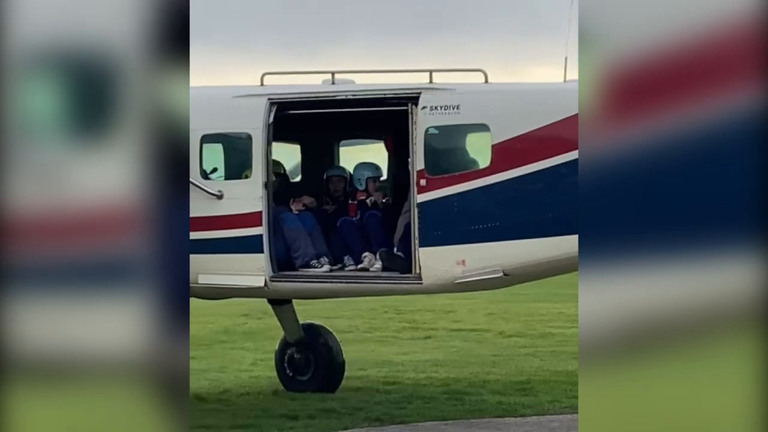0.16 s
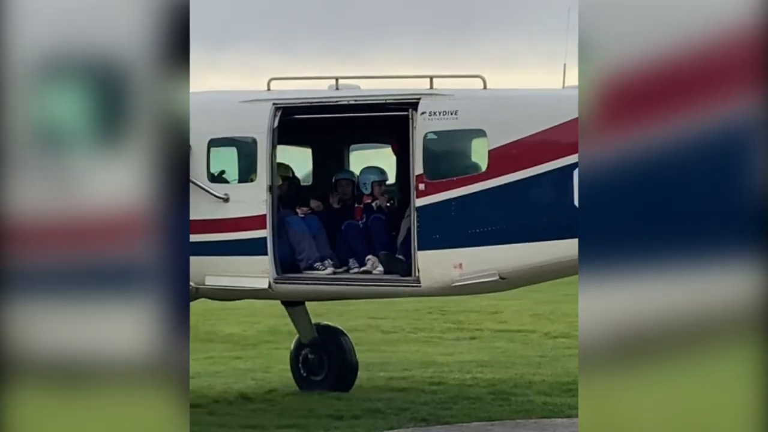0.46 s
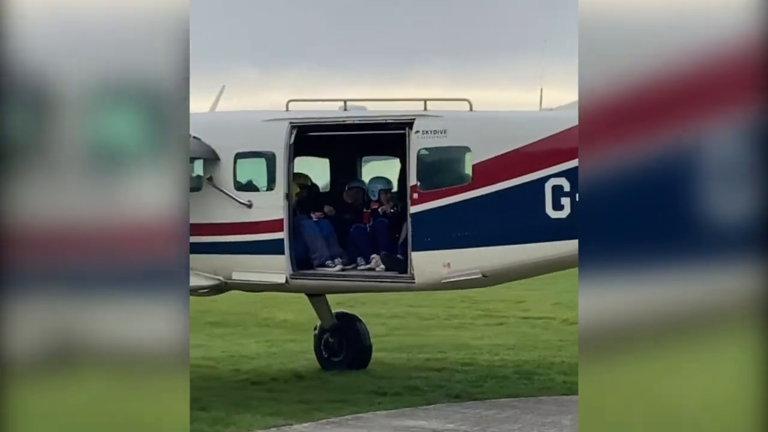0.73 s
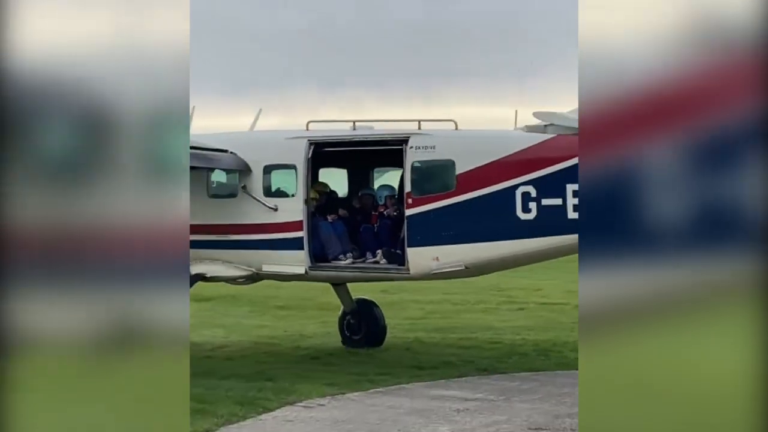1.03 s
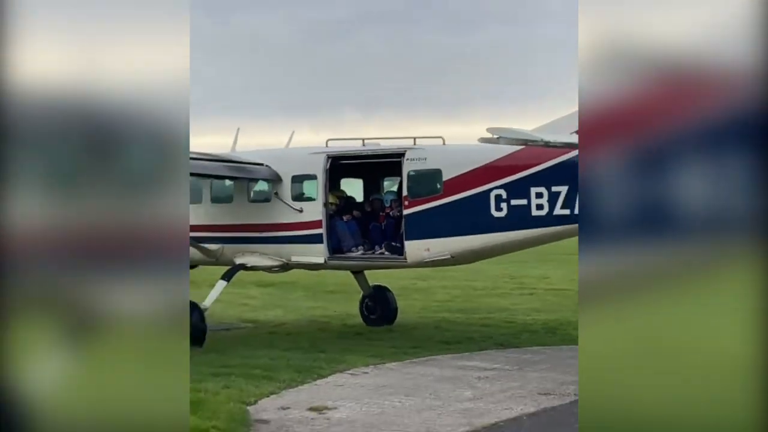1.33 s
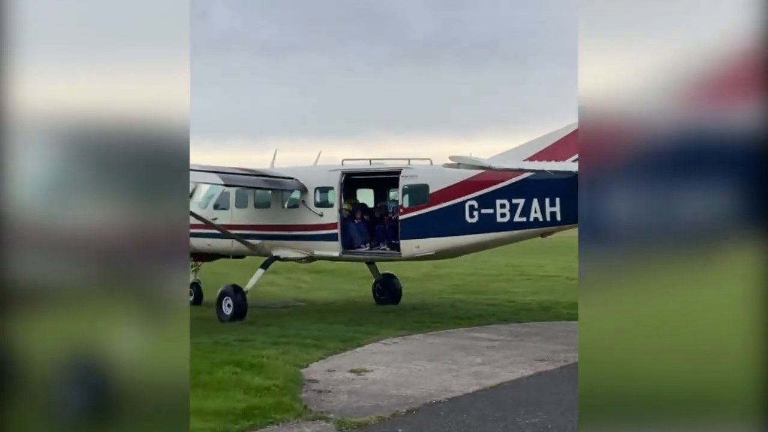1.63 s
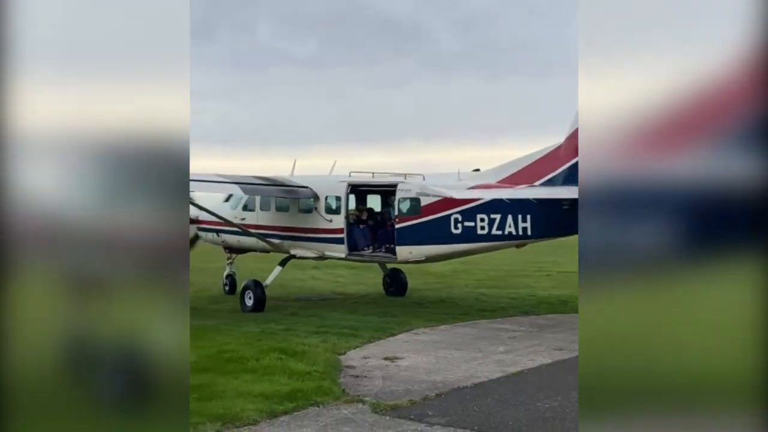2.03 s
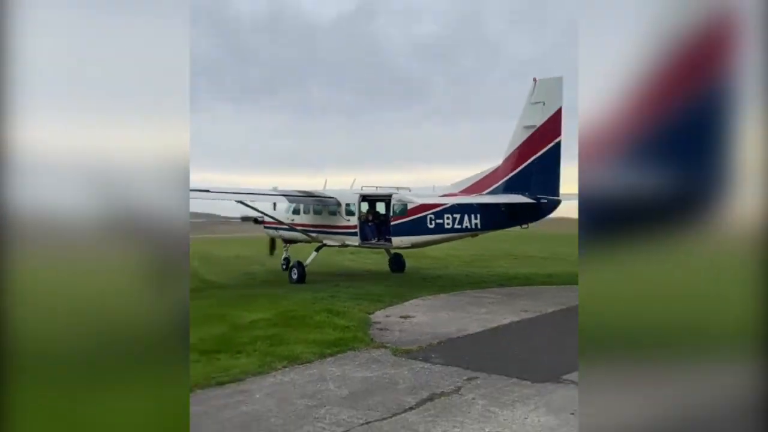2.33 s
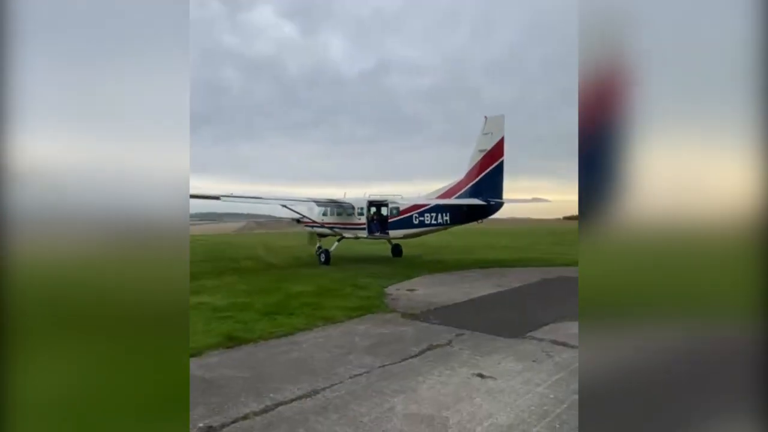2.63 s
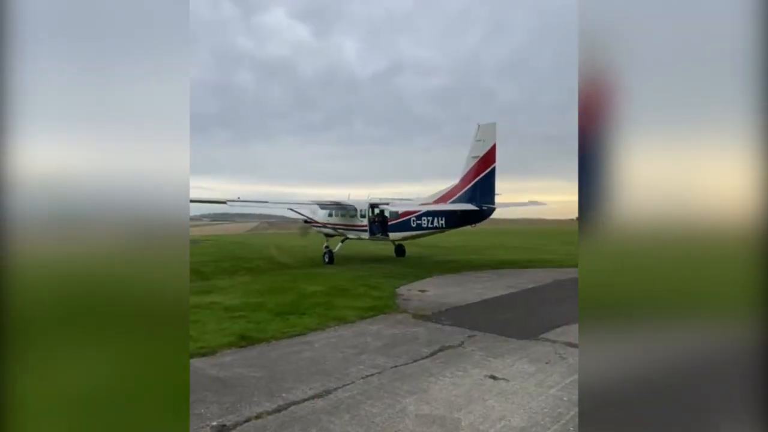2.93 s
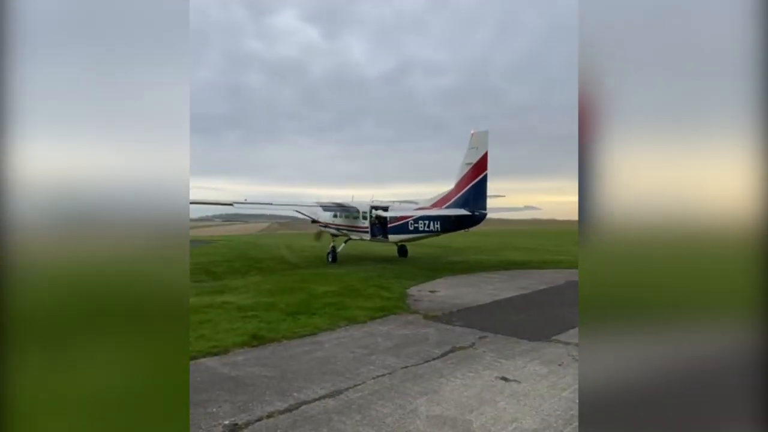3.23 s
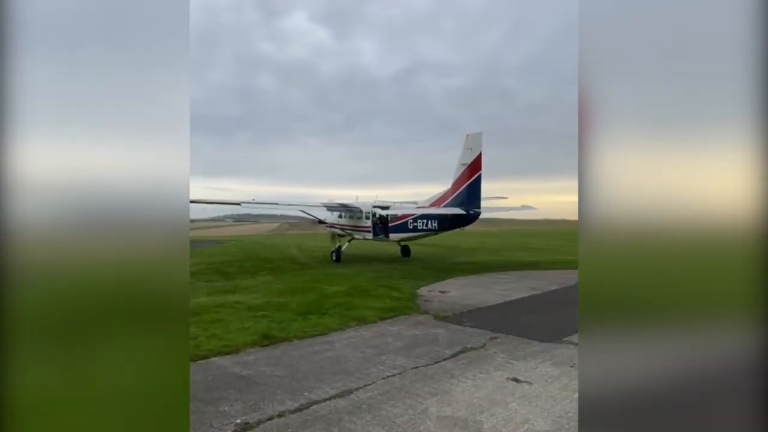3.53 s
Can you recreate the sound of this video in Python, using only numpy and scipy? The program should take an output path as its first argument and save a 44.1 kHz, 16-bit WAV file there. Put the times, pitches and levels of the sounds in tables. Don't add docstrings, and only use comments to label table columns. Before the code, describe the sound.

A single-engine propeller plane roars from the start, a low, rough, rapid blade buzz with booming exhaust, pulsing hiss and a faint breathy high whine. Harder slaps and short puffs flutter around 0.8 and 1.1 seconds, and the pitch creeps up slightly. From about 2.2 to 2.5 seconds the narrow, centred stereo picture opens wide; the engine keeps droning, its hiss and roar weakening until 3.7 seconds as it taxis away.

```python
import sys
import numpy as np
from scipy import signal
from scipy.fft import rfft, irfft, next_fast_len
from scipy.io import wavfile
from scipy.ndimage import uniform_filter1d

SR = 44100
rng = np.random.default_rng(int(sys.argv[2]) if len(sys.argv) > 2 else 0)


def voltage_ratio(decibels):
    exponent = np.asarray(decibels, float) / 20
    return 10 ** exponent


def int16_out(signal):
    q = np.round(np.clip(np.atleast_2d(signal).T, -1, 1) * 32767)
    wavfile.write(sys.argv[1], SR, q.astype(np.int16))


N = 162288
SLOW_STEP = 40


def rms_one(x):
    return x / np.sqrt(np.mean(x ** 2) + 1e-20)


def at_hz(points, hz, axis=1):
    points = np.array(points, float)
    return np.interp(np.log(np.maximum(hz, 1)), np.log(points[:, 0]), points[:, axis])


def in_time(rows):
    s, *columns = np.transpose(rows)
    return [np.interp(np.arange(N) / SR, s, column) for column in columns]


def bell(x, centre, width):
    return np.exp(-.5 * ((x - centre) / width) ** 2)


def octave_bell(hz, centre, width):
    return np.exp(-.5 * (np.log2(hz / centre) / width) ** 2)


def drift(rate, count=1):
    r = np.exp(-2 * np.pi * rate * SLOW_STEP / SR)
    settle = 2000
    white = rng.standard_normal((count, N // SLOW_STEP + 2 + settle))
    slow = signal.lfilter([1], [1, -2 * r, r * r], white)[:, settle:]
    return slow / slow.std(axis=1, keepdims=True)


def full(slow):
    return np.interp(np.arange(N) / SLOW_STEP, np.arange(len(slow)), slow)


def neighbours(rows):
    reach_orders = 1.6
    k = np.arange(len(rows))
    share = np.exp(-((k[:, None] - k) / reach_orders) ** 2)
    return share @ rows / np.sqrt((share ** 2).sum(axis=1, keepdims=True))


def banded_noise(spectrum, shared_db, own_db, rate):
    lowest, highest = spectrum[0][0], spectrum[-1][0]
    edges = lowest * 2 ** np.arange(-1 / 6, np.log2(highest / lowest) + .3, 1 / 3)
    settle = 4000
    white = rng.standard_normal((2, N + settle))
    flicker = shared_db * drift(rate / 2) + own_db * drift(rate, count=len(edges))
    out = 0
    for k, (low, high) in enumerate(zip(edges, edges[1:])):
        sos = signal.butter(2, [low, high], "band", fs=SR, output="sos")
        band = signal.sosfilt(sos, white[k % 2])[settle:]
        out = out + band * voltage_ratio(at_hz(spectrum, np.sqrt(low * high)) + full(flicker[k]))
    return rms_one(out)


def hum(hz, wide_hz):
    sos = signal.butter(2, [hz - wide_hz / 2, hz + wide_hz / 2], "band", fs=SR, output="sos")
    settle = 4000
    return rms_one(signal.sosfilt(sos, rng.standard_normal(N + settle))[settle:])


# t/s, level/dB, ring f/Hz, ring lift/dB, upper ring lift/dB, low slap lift/dB
SLAP_IN_TURN = [(0, -32, 1020, 5.5, 4, 5.5), (.2, -29.5, 930, 2, 3.5, 6.5), (.4, -32.5, 800, -0.5, 7.5, -5),
                (.58, -33, 780, -4, 4.5, 6), (.76, -29.5, 910, 3.5, 5, 3), (1.0, -26.5, 670, -1.5, -10, 5),
                (1.18, -28, 654, 2.5, -10, 8), (1.3, -26.5, 806, 14.5, -1, 1),
                (1.45, -26, 806, 3.5, -7, 3.5), (1.6, -32, 920, 12, 6.5, 9.5),
                (1.85, -29, 1000, 11.5, -3, 6.5), (2.04, -27, 780, 10, -2, 8.5),
                (2.18, -26.5, 900, 1, -3.5, 8), (2.45, -28.5, 680, 10.5, -0.5, 10.5),
                (2.7, -30.5, 1030, -3, -8.5, 7), (3.12, -38, 713, 14, 9, 10), (3.32, -32.5, 1110, 4, -1, 6),
                (3.68, -35, 1410, -4.5, -3, 7.5)]
# f/Hz, level/dB
SLAP_SPECTRUM = [(95, -1.5), (190, 4), (290, -5), (400, -9), (900, -8), (1500, -12.5), (2400, -21.5),
                 (3800, -36.5)]
# t/s, half length/s, f/Hz, level/dB
GUSTS = [(0.095, 0.081, 990, 5), (.12, 0.078, 1360, 9), (0.31, 0.042, 1420, -17), (.39, 0.046, 1310, 8.5),
         (0.394, .03, 980, 9.5), (0.445, 0.018, 1300, -5), (.5, 0.016, 1310, 5), (0.545, 0.024, 1300, 1),
         (0.594, 0.011, 1290, 12), (0.715, 0.024, 950, -9), (0.857, 0.082, 1420, 6.5),
         (.87, 0.066, 1030, -29), (0.57, 0.021, 500, 2), (.8, 0.044, 474, 4), (0.95, 0.01, 497, 8),
         (1.013, 0.02, 765, 6.5), (1.444, 0.06, 880, -4), (1.555, .05, 930, 2.5),
         (1.625, 0.064, 2430, 18.5), (1.827, 0.14, 2460, 14.5), (1.687, .05, 1950, 6),
         (1.894, .015, 900, -3), (1.95, 0.067, 800, 3), (2.125, 0.033, 470, 4), (2.143, 0.089, 1510, 8),
         (2.243, 0.074, 1600, 7), (2.272, 0.019, 730, -29), (2.35, 0.02, 1160, 8),
         (2.403, 0.028, 1190, -18), (2.525, 0.019, 1130, 9), (2.6, 0.022, 1000, -18),
         (2.648, .03, 1090, 9.5), (2.725, 0.031, 890, 14.5), (2.718, .025, 1300, 9.5),
         (2.81, 0.045, 1150, 8), (2.864, 0.038, 910, 2), (2.798, .12, 2080, 9.5), (2.99, .04, 945, 4.5),
         (3.123, .05, 1410, 5), (3.183, 0.028, 845, 4), (3.313, 0.021, 1190, 4), (3.352, 0.018, 1120, -2),
         (3.46, 0.025, 1270, 7.5), (3.605, 0.064, 1590, 12), (3.004, 0.12, 580, -12.5),
         (2.2, 0.23, 600, 2.5), (1.803, 0.17, 284, -9.5), (3.56, 0.081, 800, -3.5), (1.72, 0.24, 790, -1),
         (2.4, 0.23, 380, 3)]
# t/s, shiver of the overtones/rad
TURBULENCE = [(0, .4), (.7, .36), (.9, .28), (1.3, .15), (2.3, .15), (2.7, .4), (3.68, .4)]
# t/s, level/dB
HARD_SLAPS = [
    (.763, 2),
    (.7845, 8),
    (.838, 3),
    (1.169, 7),
    (1.774, 5),
    (2.512, 2),
]


def propeller(turns):
    slap_db, ring_hz, ring_db, upper_db, low_db = in_time(SLAP_IN_TURN)
    overtones, slap_rad, low_lead_rad = 40, 1.9, .2
    gust_width = .13

    blade = (turns + .5).astype(int)
    size, late = rng.standard_normal((2, 400))
    jitter_s, passes_per_s = .00004, 95
    turns = turns + uniform_filter1d(late[blade], size=200) * jitter_s * passes_per_s
    blade_db = 1.0 * uniform_filter1d(size[blade], size=200)

    fade_db = 1.0 * neighbours(drift(7, count=overtones))
    wander = .4 * neighbours(drift(1.5, count=overtones))
    t = np.arange(wander.shape[1]) * SLOW_STEP / SR
    shiver = np.interp(t, *np.transpose(TURBULENCE))
    wander = wander + shiver * neighbours(drift(14, count=overtones))
    hard_db = sum(db * bell(t, s, .004) for s, db in HARD_SLAPS)

    rate = np.mean(np.diff(turns)) * SR
    out = 0
    for k in range(1, overtones + 1):
        hz = k * rate
        lift_db = np.minimum(ring_db, 12) * octave_bell(hz, ring_hz, .22)
        lift_db = lift_db + upper_db * octave_bell(hz, 1.75 * ring_hz, .17)
        lift_db = lift_db + low_db * octave_bell(hz, 480, .18)
        gust_db = sum(db * octave_bell(hz, centre, gust_width) * np.exp(-((t - s) / half) ** 2)
                      for s, half, centre, db in GUSTS)
        flicker_db = full(fade_db[k - 1] + gust_db + hard_db * (k > 6))
        level_db = slap_db if k > 2 else slap_db.mean()
        db = at_hz(SLAP_SPECTRUM, hz) + lift_db + flicker_db + level_db
        phase = slap_rad + np.sqrt(k / 8) * full(wander[k - 1]) - low_lead_rad * max(7 - k, 0) ** 2 / 9
        out = out + voltage_ratio(db) * np.cos(2 * np.pi * k * turns + phase)
    return out * voltage_ratio(blade_db)


# f/Hz, density/dB
HISS = [(900, -4.5), (1300, -0.5), (2300, 0.5), (3200, -3.5), (6300, -6.5), (8600, -3), (9300, -24.5),
        (13000, -10.5)]
# t/s, level/dB, length/s
PUFFS = [
    (0.217, -1, 0.027),
    (0.453, 1, 0.016),
    (0.81, 3.5, 0.0053),
    (1.11, 7.5, 0.0053),
    (1.17, 5.5, 0.0064),
    (1.32, 0.5, .02),
    (2.534, 1, 0.043),
]


def wash(turns, near_db):
    t = np.arange(N) / SR
    depth, sharpness, lag_turns = .39, 2.8, .03
    throb = np.exp(sharpness * (np.cos(2 * np.pi * (turns - lag_turns)) - 1))
    gate = rms_one(1 - depth + depth * throb)
    puff_db = sum(db * bell(t, s, length) for s, db, length in PUFFS)
    hiss = banded_noise(HISS, shared_db=.5, own_db=1.3, rate=16)
    return voltage_ratio(-31.5 + 1.07 * near_db + puff_db) * gate * hiss


# f/Hz, density/dB
ROAR = [(28, -64), (50, -6.5), (72, 1), (130, 1), (260, -9), (350, -17), (600, -8), (1300, -32.5)]
# t/s, level/dB, length/s
SWELLS = [(0.445, 10, 0.009), (0.97, 4.5, 0.011), (1.174, 0, 0.14), (1.37, 5, 0.014), (1.52, -0.5, 0.033),
          (1.737, 6, 0.1), (2.25, -15, 0.024), (2.35, 4, 0.079), (3.106, -24, 0.012), (3.158, 7.5, 0.027),
          (3.254, -9, 0.014), (3.491, 8, 0.01), (3.543, -1, 0.043)]


def exhaust(near_db):
    t = np.arange(N) / SR
    roar = banded_noise(ROAR, shared_db=.54, own_db=-.27, rate=4.3)
    roar = voltage_ratio(-27 + .69 * near_db) * roar

    swell_db = sum(db * bell(t, s, length) for s, db, length in SWELLS)
    flutter_db = 2.0 * full(drift(14)[0])
    lumps_db = 1 * full(drift(2.5)[0])
    boom = voltage_ratio(-24.5 + .091 * near_db + swell_db + flutter_db + lumps_db) * hum(205.2, 55.8)

    breath_db = .41 * full(drift(6.2)[0])
    whine = voltage_ratio(-41.5 + .56 * near_db + breath_db) * hum(7180, 260)
    return roar + boom + whine


# f/Hz, side over mid/dB
PHASE_FLIP = [(6150, 4.5), (6450, 24), (7300, 54.5), (8000, 45), (8450, -19), (9000, 4.5), (9400, -31)]


def pair(x, table, top_db, colour):
    size = next_fast_len(N + 8192)
    hz = np.arange(size // 2 + 1) * SR / size
    sound = rfft(x, size) * voltage_ratio(at_hz(colour, hz))
    side_db = [row[:2] for row in table] + [(5250, top_db)] + PHASE_FLIP
    ratio = voltage_ratio(at_hz(side_db, hz))
    lean = np.clip(at_hz(table, hz, axis=2), -1, 1) * (hz < 5500)
    lead = np.clip(at_hz(table, hz, axis=3), -1, 1) * (hz < 5500)
    lead = lead + (hz > 6550) * (hz < 8150)

    scatter_s = .12
    decay = np.exp(-np.arange(8192) / SR / scatter_s)
    burst = rfft(rng.standard_normal(8192) * decay, size)
    rest = np.sqrt(np.clip(1 - lean ** 2 - lead ** 2, 0, 1)) * burst / np.abs(burst)
    mid = sound / np.sqrt(1 + ratio ** 2)
    whole_side = mid * ratio * (lean + 1j * lead + rest)

    band_hz, bands, patchy_db = 450, 13, 5
    band = np.minimum(hz // band_hz, bands - 1)
    side = 0
    for k, patch in enumerate(drift(7, count=bands)):
        weakness = np.clip(-1 - at_hz(table, band_hz * (k + .5)) / 8, 0, 1)
        depth_db = patchy_db * weakness * (0 < k < bands - 1)
        side = side + irfft(whole_side * (band == k), size)[:N] * voltage_ratio(depth_db * full(patch))
    mid = irfft(mid, size)[:N]
    return np.array([mid + side, mid - side])


# f/Hz, side over mid/dB, lean to the left/-1..1, lead of the left/-1..1
NARROW = [(100, -30, 0, .1), (400, -22, -.3, .2), (650, -13, -.6, .4), (1150, -19, .6, .1),
          (1900, -24, 0, .1), (2600, -15, .1, .4), (3500, -30, 0, 0), (4600, -17, 0, .3)]


def narrow_picture(x):
    return pair(x, NARROW, -28, [(100, .025)])


# t/s, length/s
LEAKS = [
    (.23, .04),
    (.455, .02),
    (1.06, .025),
    (1.155, .025),
    (1.315, .025),
]


def leaks():
    t = np.arange(N) / SR
    opening = sum(np.exp(-((t - s) / length) ** 4) for s, length in LEAKS)
    return voltage_ratio(-52) * hum(6500, 400) * opening


# f/Hz, side over mid/dB, lean to the left/-1..1, lead of the left/-1..1
WIDE = [(60, -22, -.6, 0), (170, -9, -.97, .15), (480, -10, -.9, .3), (750, -4, -.1, .7),
        (1050, -10, .85, .4), (2050, -13, -.1, .7), (2900, -2, 0, .4), (3450, 18, 0, .3), (3900, 6, 0, .3),
        (4300, -1, .3, .3)]
# f/Hz, level/dB
WIDE_COLOUR = [(300, 0), (600, -5), (1200, 5), (1650, 0.5), (2050, 4), (2600, -3), (3500, 2.5)]
# f/Hz, level/dB
WIDE_RIDGE = [(4500, -4.5), (5250, 2), (5900, -0.5), (8000, -1.5)]


def wide_picture(x):
    return pair(x, WIDE, -10, WIDE_COLOUR + WIDE_RIDGE)


# t/s, blade passes per second/Hz
SPEED = [(0, 92.45), (.4, 92.85), (.8, 93.3), (1.1, 93.9), (1.6, 94.27), (2.1, 94.73), (2.6, 94.9),
         (3.1, 95.05), (3.68, 95.0)]
# t/s, level/dB
NEARNESS = [(0.0, -47), (0.01, -45.5), (0.97, -46.5), (1.13, -46.5), (2.88, -51), (3.68, -52.5)]


def scene():
    (rate,), (near_db,) = in_time(SPEED), in_time(NEARNESS)
    near_db = near_db - near_db.mean()
    turns = .22 + np.cumsum(rate) / SR
    plane = propeller(turns) + wash(turns, near_db) + exhaust(near_db)
    open_s, open_length_s = 2.21, .27
    opened = np.clip((np.arange(N) / SR - open_s) / open_length_s, 0, 1)
    return (1 - opened) * narrow_picture(plane) + leaks() + opened * wide_picture(plane)


def roll_off(x):
    return signal.sosfilt(signal.butter(12, 11840, fs=SR, output="sos"), x)


def record(dry):
    limit, cutoff_hz = .8, 12600
    rounded = limit * np.tanh(dry / limit)
    low_pass = signal.cheby2(12, 60, cutoff_hz, fs=SR, output="sos")
    mix = signal.sosfilt(low_pass, rounded)
    return roll_off(mix)


dry = scene()
out = record(dry)
int16_out(out)
```